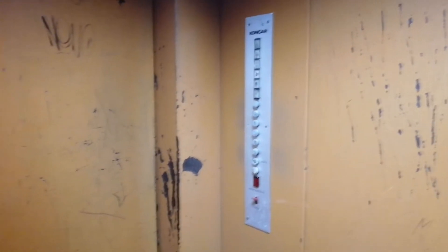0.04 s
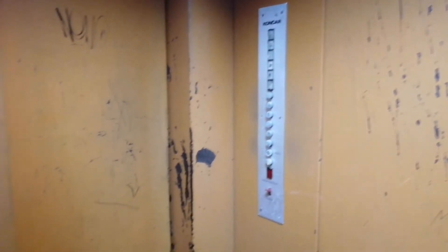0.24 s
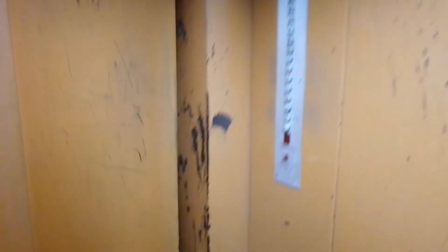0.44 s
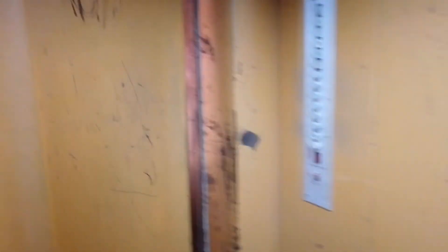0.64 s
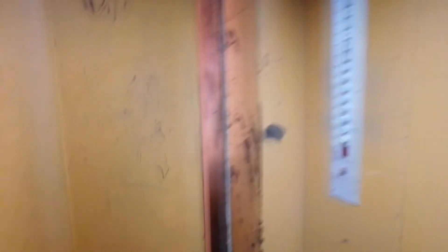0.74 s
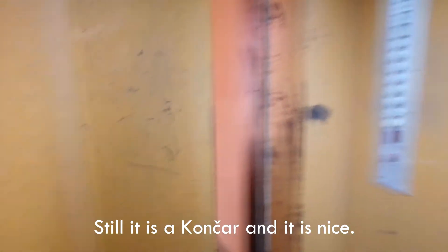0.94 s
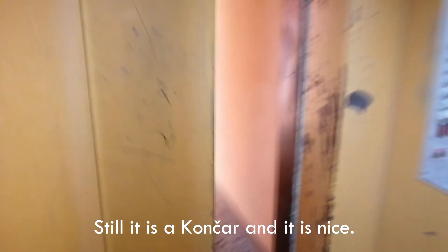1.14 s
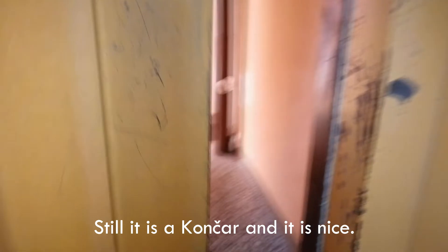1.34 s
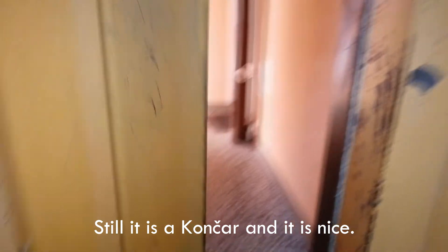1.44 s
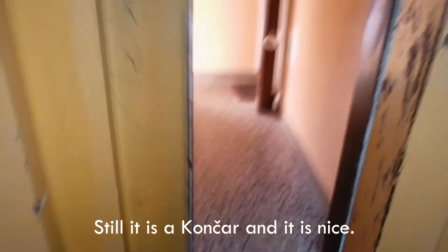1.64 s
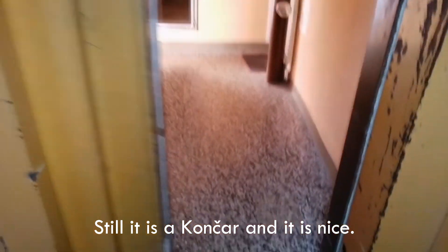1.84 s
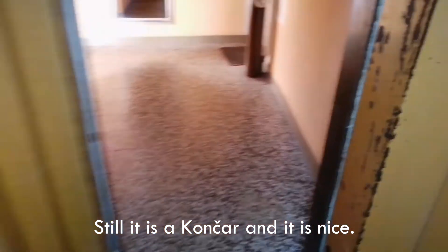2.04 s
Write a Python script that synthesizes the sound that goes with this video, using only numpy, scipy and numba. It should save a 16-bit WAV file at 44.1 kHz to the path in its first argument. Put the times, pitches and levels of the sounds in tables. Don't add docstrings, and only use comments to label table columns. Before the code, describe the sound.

An old sliding lift door opens, heard close inside a small boxy car. Faint shaft hum and air come first; at 0.2 s a latch scrapes with a bright metallic hiss. Hard clanks and thuds cluster from 0.38 to 0.65 s as rollers rumble, strongest near 0.6. Hollow panel groans, rattles and smaller knocks follow, fading after 1.5 s, with a short thin squeal near 2.07 s.

```python
import sys
import numpy as np
from scipy import signal
from scipy.fft import rfft, irfft
from scipy.io import wavfile
from scipy.ndimage import uniform_filter1d
from numba import njit

SR = 44100
rng = np.random.default_rng(int(sys.argv[2]) if len(sys.argv) > 2 else 0)


def to_wav(s):
    ch = np.atleast_2d(s).T
    pcm = np.round(np.clip(ch, -1, 1) * 32767)
    wavfile.write(sys.argv[1], SR, pcm.astype(np.int16))


def how_loud(loudness_db):
    steps = np.asarray(loudness_db, float) / 20
    return 10 ** steps


N = 92610
T = np.arange(N) / SR

# pitch_hz, width_hz, level_db
HUM_TONES = [(35.3, 28, -57), (88.7, 9.3, -60.5), (162, 120, -58.5), (233.4, 24, -53), (298, 61, -74),
             (368, 27, -63)]
# pitch_hz, level_db (per Hz)
SHAFT_AIR = [(250, -60), (420, -0.5), (1080, -8), (1230, -20.5), (2110, -17.5), (4270, -32.5),
             (8120, -22.5), (10800, -40.5), (15000, -33)]
# pitch_hz, width_hz, level_db
LATCH_TONES = [(1660, 190, -7), (2250, 180, 2.5), (2985, 50, 5), (3280, 110, 5), (6060, 130, -8),
               (6700, 160, 6.5), (7200, 350, -2), (8050, 270, 3), (8800, 400, -5)]
# pitch_hz, level_db (per Hz)
LATCH_SCRAPE = [(710, -54), (1200, -18), (1590, -30), (2740, -11), (3080, 2), (3900, -25), (5790, 7),
                (8510, 3), (15500, -17)]
# time_s, level_db, brightness_db, car_sway_db, floor_drumming_db
ROLLING = [(0.2, -64, -11, 2, 0), (0.242, -54.5, 0.5, -18, 7.5), (0.41, -42, -3, -4.5, -10),
           (0.59, -29, -9, -7, -5.5), (0.664, -33.5, -5.5, -12, -14.5), (0.78, -35, -8.5, -3.5, -8.5),
           (0.876, -34.5, -7, -0.5, -8), (1.004, -36, -0.5, -11, -16), (1.115, -36.5, -2, 1, -2),
           (1.155, -37.5, -7.5, -1.5, -4), (1.3, -36.5, -4, -2, -5), (1.39, -35.5, -6.5, 0, -12),
           (1.448, -39.5, -5.5, -5, -5), (1.55, -40.5, -12, 2, -5), (1.7, -42, -6, -4.5, -3.5),
           (1.85, -46, -5.5, 4.5, -6.5), (2.004, -52.5, -7, 2.5, -15), (2.1, -54, -1, -8, -7)]
# pitch_hz, width_hz, level_db
PANEL_TONES = [(160.4, 15.6, -3.5), (217, 37, -17.5), (245, 12.7, -7), (273, 20, -8.5), (320, 13, -5),
               (346, 26, -13.5), (384.9, 11.4, -8), (409, 93, -12.5), (486.8, 22, -11), (526, 67, -15),
               (944, 13, -24), (1131, 34, -17), (1305, 27, -23.5)]
# pitch_hz, level_db (per Hz)
RAIL_RASP = [(90, -49), (160, -4), (300, 3.5), (450, -1.5), (800, -0.5), (1200, -9), (2000, -18.5),
             (4200, -35.5), (5500, -51)]
# pitch_hz, level_db (per Hz)
GUIDE_HISS = [(1760, -67), (3000, 8), (4120, -17), (5130, 4), (8530, 4), (9580, 0), (13000, -32),
              (15500, -39)]
# pitch_hz, width_hz, level_db
CAR_TONES = [(31.7, 5.8, 3.5), (39, 53, -0.5), (60, 42, 5.5)]
# pitch_hz, width_hz, level_db
FLOOR_TONES = [(67.6, 8.6, -5.5), (85.6, 8.1, 5)]
# start_s, end_s, pitch_hz, level_db
SINGING = [(0.52, 0.625, 262, -28), (0.635, 0.725, 262, -29), (0.72, 0.8, 262, -36),
           (0.805, 0.855, 262, -33), (0.89, 0.935, 251, -37), (0.945, 0.985, 262, -34),
           (1.04, 1.09, 238, -38), (1.09, 1.135, 250, -31), (1.17, 1.3, 241, -40), (1.31, 1.41, 243, -38),
           (1.42, 1.46, 236, -36), (1.47, 1.5, 236, -35), (1.51, 1.55, 236, -38), (1.57, 1.62, 238, -38),
           (0.53, 0.7, 81, -34), (0.72, 0.86, 84, -40), (1.2, 1.3, 322, -40), (1.31, 1.45, 319, -39),
           (1.17, 1.33, 735, -45), (1.33, 1.41, 735, -46), (1.39, 1.47, 640, -45), (1.33, 1.41, 515, -45),
           (1.5, 1.6, 478, -46), (1.0, 1.13, 1140, -49), (1.37, 1.405, 1300, -47), (1.34, 1.38, 2250, -51),
           (1.385, 1.41, 2270, -51), (1.35, 1.39, 2600, -54), (1.34, 1.375, 1980, -52),
           (0.87, 1.0, 42, -36), (1.39, 1.57, 50, -35), (0.4, 0.47, 322, -41), (0.6, 0.66, 910, -45),
           (0.965, 1.005, 318, -32), (0.49, 0.62, 385, -43), (0.95, 1.14, 385, -43),
           (0.27, 0.38, 3000, -55), (0.378, 0.42, 1880, -46), (0.97, 1.09, 740, -46)]
# start_s, clank_db, body_db, thud_db, body_pitch_hz
KNOCK_EVENTS = [(0.375, -26.5, -30.5, -18, 2000), (0.455, -24, -35.5, -39, 2640),
                (0.487, -23.5, -32.5, -22, 2000), (0.512, -39, -31.5, -18.5, 1770),
                (0.6432, -25.5, -34, -28, 2460), (0.821, -36, -51, -55, 2430),
                (0.847, -33.5, -44.5, -74, 2430), (0.939, -41, -32.5, -10, 1430),
                (1.009, -33.5, -34, -45, 1160), (1.041, -41, -38.5, -46, 3000),
                (1.102, -85, -51, -34, 1190), (1.156, -43.5, -80, -22, 3300), (1.345, -32, -46, -31, 2300),
                (1.398, -32, -47, -40, 2510), (1.473, -37.5, -50, -52, 3400),
                (1.539, -34.5, -53.5, -31, 3400), (1.602, -32.5, -55, -56, 3400),
                (1.799, -42.5, -56.5, -32, 2300), (1.867, -70, -49, -56, 1470),
                (1.997, -45, -57.5, -72, 3000)]
# pitch_hz, level_db (per Hz)
CLANK_STEEL = [(1200, -6), (2800, -27), (4200, -16.5), (5400, -13), (6900, -12), (8300, -3), (9600, -17.5),
               (15500, -39)]
# pitch_hz, width_hz, level_db
LINKAGE_TONES = [(1030, 15, 12), (1201.5, 15.5, 14), (1337, 76, 10), (1871, 210, 3), (2000, 54, -4.5),
                 (2300, 420, 1.5), (2670, 72, 2.5), (3000, 450, 7.5), (3400, 240, 9.5)]
# pitch_hz, width_hz, level_db
THUD_TONES = [(237, 38, -2), (328, 38, 4.5), (367.3, 17, -2), (465, 90, -15), (498, 29, -8)]
# start_s, level_db
HARD_CONTACTS = [(0.3765, -49), (0.4547, -54), (0.482, -44), (0.51, -48), (0.615, -38), (0.6448, -32.5),
                 (0.848, -36), (1.009, -40), (1.042, -57), (1.345, -48), (1.398, -37), (1.602, -65)]
# start_s, level_db
WORN_SPOTS = [(0.49, -14.5), (0.547, -13), (0.572, -22), (0.597, -40), (0.61, -40), (0.724, -21),
              (0.819, -33), (0.954, -18), (1.229, -46), (1.273, -35), (1.302, -24), (1.333, -27),
              (1.452, -40), (1.494, -20.5), (1.533, -30), (1.604, -27), (1.714, -28), (1.813, -42)]
# pitch_hz, width_hz, level_db
HANGER_TONES = [(566, 130, 9), (890, 350, 2), (1320, 840, -7)]
# time_s, chatter_db, note_db
SHOE_SQUEAL = [
    (1.876, -94, -85),
    (1.9, -57.5, -75),
    (1.93, -68, -75),
    (1.945, -59, -72),
    (1.97, -65, -81),
    (2.0, -60, -79),
    (2.025, -49.5, -53),
    (2.047, -67, -48),
    (2.072, -50, -40.5),
    (2.1, -52, -54),
]


def unit(x):
    return x / np.sqrt(np.mean(x ** 2))


def even(x, span_s=0.0225):
    power = uniform_filter1d(x ** 2, int(span_s * SR))
    return unit(x / (power + 1e-12) ** 0.27)


@njit
def svf(x, hz, width):
    y, b, l = np.empty(len(x)), 0., 0.
    g, k = np.tan(np.pi * hz / SR), width / hz
    for i in range(len(x)):
        v = (b + g * (x[i] - l)) / (1 + g * (g + k))
        b, l, y[i] = 2 * v - b, l + 2 * g * v, k * v
    return y


def steep(x, hz, width, second_width):
    once = svf(x, float(hz), float(width))
    return svf(once, float(hz), float(second_width))


def ring(x, modes, span_s=0.057):
    total = 0
    for k, (hz, width, db) in enumerate(modes):
        total = total + (-1) ** k * how_loud(db) * even(steep(x, hz, width, 2 * width), span_s)
    return total


def colour(x, table):
    walls_t60_s, walls_db = 0.49, -5
    hz, db = np.array(table).T
    f = np.arange(N // 2 + 1) * SR / N + 1
    walls = rfft(rng.standard_normal(N) * how_loud(-60 * T / walls_t60_s))
    ripple = 1 + how_loud(walls_db) * unit(np.abs(walls))
    depth = np.clip(f / 500 - 1, 0, 2)
    tone = how_loud(np.interp(np.log(f), np.log(hz), db))
    return unit(irfft(rfft(x) * ripple ** depth * tone, N))


def walk(rate_hz):
    k = int(SR / rate_hz)
    steps = np.repeat(rng.standard_normal(N // k + 1), k)
    return unit(uniform_filter1d(uniform_filter1d(steps, k), k)[:N])


def grit(rate_hz, scatter_db):
    hits = rng.random(N) < rate_hz / SR
    return hits * rng.choice([-1., 1.], N) * how_loud(scatter_db * rng.exponential(size=N))


def burst(start_s, attack_s, t60_s, hold_s=0):
    rise = np.clip((T - start_s) / max(attack_s, 1e-4), 0, 1) ** 1.5
    return rise * how_loud(-60 * np.maximum(T - start_s - attack_s - hold_s, 0) / t60_s)


def shaft():
    air_db, stir_s, stir_db = -66.5, 0.11, 5.5
    stir = stir_db * np.clip((T - stir_s) / 0.013, 0, 1)
    hum = ring(rng.standard_normal(N), HUM_TONES)
    air = colour(rng.standard_normal(N), SHAFT_AIR)
    return hum + air * how_loud(air_db + stir + 0.38 * walk(25))


def latch():
    start_s, attack_s, hold_s, ring_lag_s = 0.2102, 0.022, 0.024, 0.014
    chatter = unit(grit(4100, 2.0)) + rng.standard_normal(N)
    hiss = how_loud(2.5) * colour(chatter, LATCH_SCRAPE) * burst(start_s, attack_s, 0.19, hold_s)
    late = how_loud(-7) * unit(svf(chatter, 2200.0, 1500.0)) * burst(start_s + 0.015, 0.041, 0.76)
    steel = unit(ring(chatter, LATCH_TONES)) * burst(start_s + ring_lag_s, attack_s, 0.28, hold_s)
    return how_loud(-38.5) * (hiss + late + steel)


def rollers():
    bumps_per_s, bump_scatter_db, rail_db = 600, 1, 2
    guide_db, guide_follows = -56.5, 0.73
    s, db, bright, sway, drum = np.array(ROLLING).T
    start = np.clip((T - 0.24) / 0.049, 0, 1)
    effort = np.interp(T, s, db)

    bumps = unit(grit(bumps_per_s, bump_scatter_db)) + 0.71 * rng.standard_normal(N)
    panel = even(ring(bumps, PANEL_TONES)) * how_loud(effort)

    scrape = unit(grit(2500, 0.55)) + rng.standard_normal(N)
    rasp = colour(scrape, RAIL_RASP) * how_loud(effort + np.interp(T, s, bright) + rail_db + walk(18.07))

    slow_effort = uniform_filter1d(effort, SR // 4)
    hiss = colour(rng.standard_normal(N), GUIDE_HISS) * how_loud(guide_db + guide_follows * (slow_effort + 35.5))

    car = even(ring(rng.standard_normal(N), CAR_TONES), 0.32) * how_loud(effort + np.interp(T, s, sway))
    deck = even(ring(rng.standard_normal(N), FLOOR_TONES), 0.06) * how_loud(effort + np.interp(T, s, drum))
    return start * (panel + rasp + hiss) + (car + deck) * np.clip(start, 0.3, 1)


def whines():
    wander, flicker_db, gain_db = 0.012, 2, 1
    out = 0
    for start_s, end_s, hz, db in SINGING:
        phase = 2 * np.pi * np.cumsum(hz * (1 + wander * walk(40))) / SR
        middle_s = (start_s + end_s) / 2
        shape = np.interp(T, (start_s, middle_s, end_s), (0, 1, 0)) ** 0.4
        out = out + 2 ** 0.5 * np.sin(phase) * shape * how_loud(db + gain_db + flicker_db * walk(50))
    return out


def shards():
    return unit(grit(4000, 1.46)) + rng.standard_normal(N)


def knocks():
    attack_s, hold_s, spread_oct = 0.0025, 0.009, 0.5
    air_hz, air_t60_s, air_floor_db = 11700, 0.2, -30
    bars = np.array([ring(shards(), [mode]) for mode in LINKAGE_TONES])
    bar_hz = np.array(LINKAGE_TONES)[:, 0]
    clank, body, thud = 0, 0, 0
    for s, clank_db, body_db, thud_db, hz in KNOCK_EVENTS:
        a = s - attack_s
        crack = how_loud(-18) * burst(a, attack_s / 2, 0.0075)
        late = how_loud(-16.5) * burst(s, 0.078, 1)
        clank = clank + how_loud(clank_db - 14) * (crack + burst(a, attack_s, 0.21, hold_s) + late)

        near = np.exp(-(np.log2(bar_hz / hz) / spread_oct) ** 2)
        linkage = unit(near @ bars) + 0.65 * unit(svf(shards(), float(hz), 0.6 * hz))
        body = body + how_loud(body_db - 11) * burst(a, 0.0073, 0.5, 0.02) * linkage
        thud = thud + how_loud(thud_db - 13.5) * burst(s, 0.012, 0.17)

    air = how_loud(air_floor_db) * clank
    for s, db in HARD_CONTACTS:
        air = air + how_loud(db) * burst(s - attack_s, attack_s, air_t60_s, hold_s)
    steel = colour(shards(), CLANK_STEEL)
    top = signal.sosfilt(signal.butter(4, air_hz, "high", fs=SR, output="sos"), steel)
    low = signal.sosfilt(signal.butter(4, air_hz, fs=SR, output="sos"), steel)
    return clank * low + air * top + body + thud * even(ring(shards(), THUD_TONES))


def jolts():
    shape = 0
    for s, db in WORN_SPOTS:
        shape = shape + how_loud(db - 16) * burst(s - 0.002, 0.001, 0.063)
    return shape * even(ring(rng.standard_normal(N), HANGER_TONES, 0.0062), 0.0078)


def squeal():
    chatter_hz, note_hz, hiss_hz, hiss_db = 2220, 2353, 5700, -58.5
    s, chatter_db, note_db = np.array(SHOE_SQUEAL).T
    slip = rng.standard_normal(N)
    chatter = even(steep(slip, chatter_hz, 160, 150), 0.035)
    chatter = chatter * how_loud(np.interp(T, s, chatter_db, left=-120))
    note = even(steep(slip, note_hz, 35, 34), 0.011)
    note = note * how_loud(np.interp(T, s, note_db, left=-120))
    hiss = unit(steep(rng.standard_normal(N), hiss_hz, 2200, 2200))
    return chatter + note + hiss * how_loud(hiss_db) * burst(1.98, 0.03, 3)


def scene():
    mix = shaft() + latch() + rollers() + whines() + knocks() + jolts() + squeal()
    return mix[None]


def roll_off(x):
    return signal.sosfilt(signal.butter(12, 15730, fs=SR, output="sos"), x)


def record(dry):
    top_hz = 15400
    heard = signal.sosfilt(signal.butter(12, top_hz, fs=SR, output="sos"), dry)
    return roll_off(heard)


dry = scene()
out = record(dry)
to_wav(out)
```